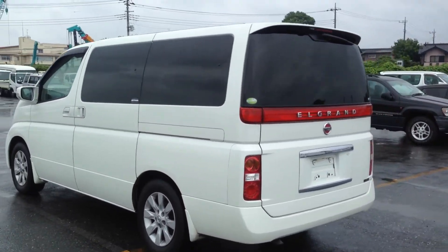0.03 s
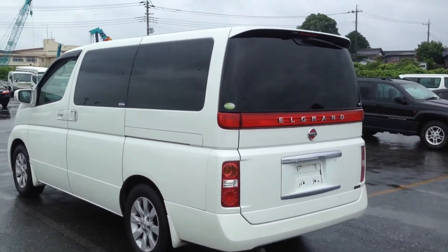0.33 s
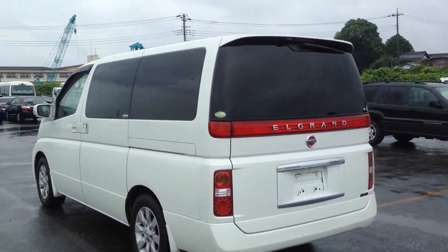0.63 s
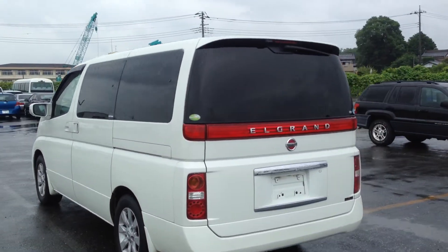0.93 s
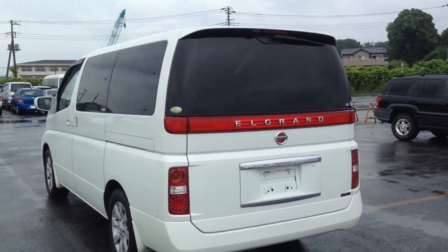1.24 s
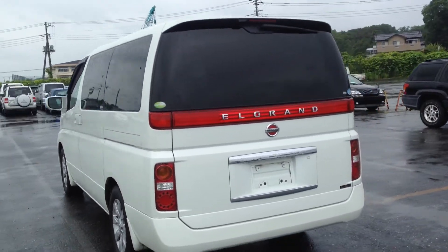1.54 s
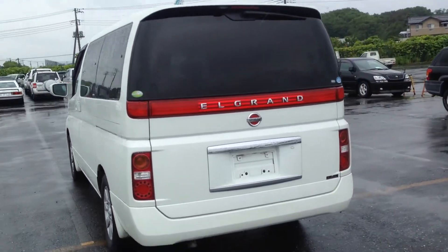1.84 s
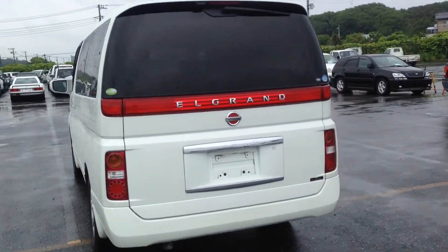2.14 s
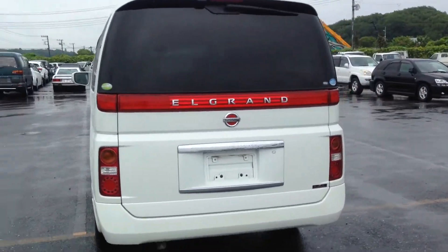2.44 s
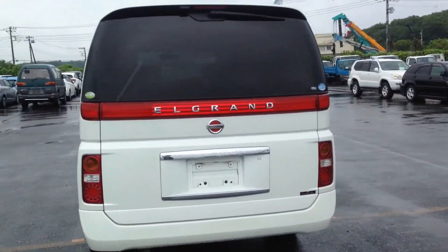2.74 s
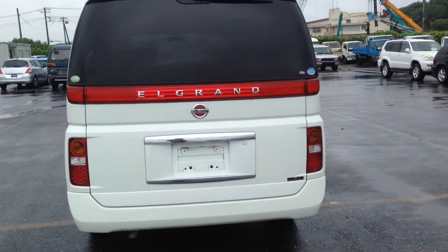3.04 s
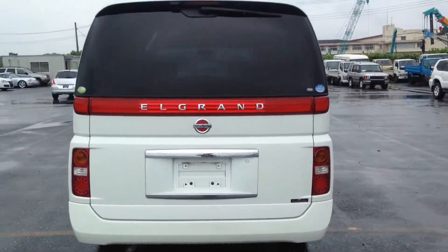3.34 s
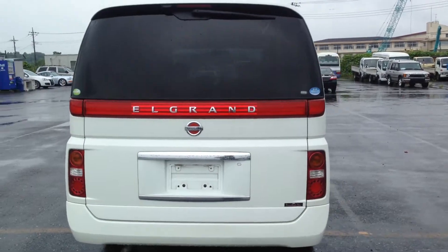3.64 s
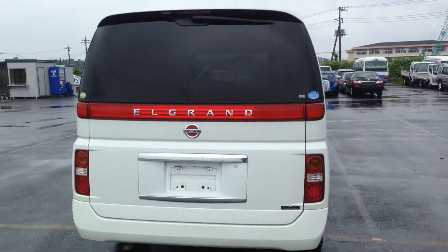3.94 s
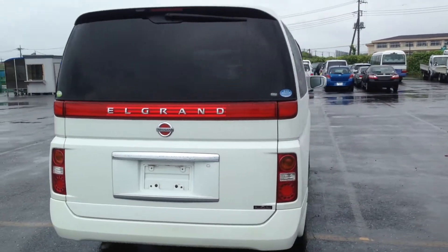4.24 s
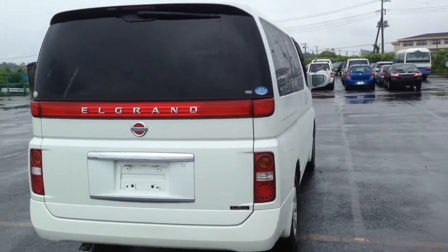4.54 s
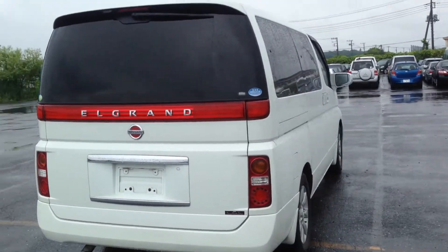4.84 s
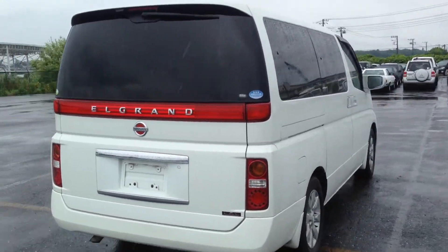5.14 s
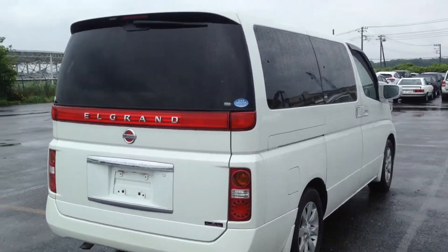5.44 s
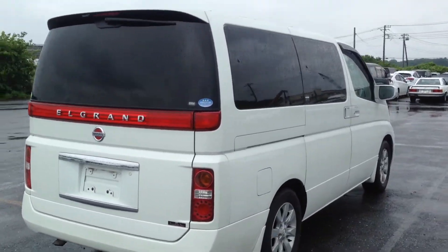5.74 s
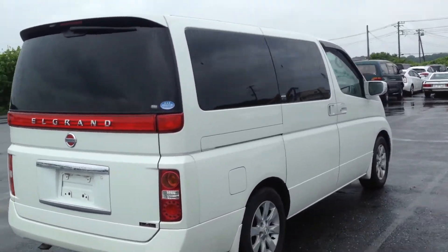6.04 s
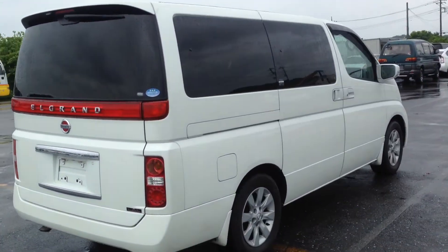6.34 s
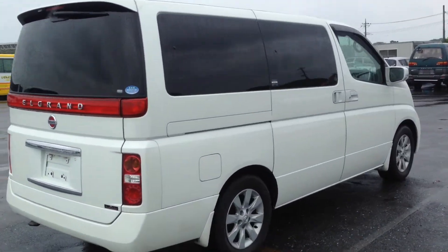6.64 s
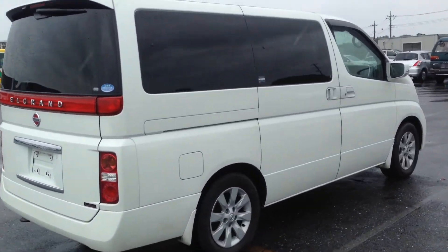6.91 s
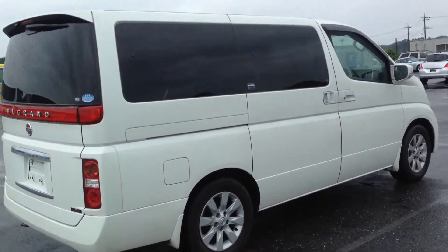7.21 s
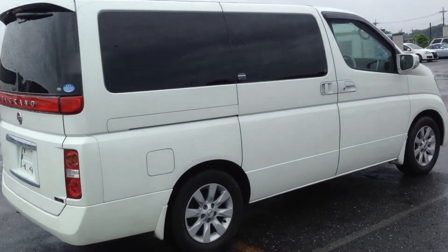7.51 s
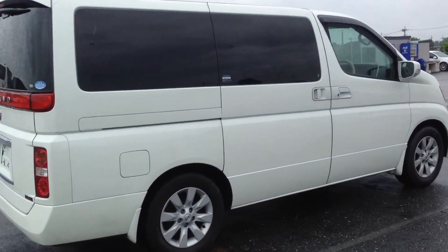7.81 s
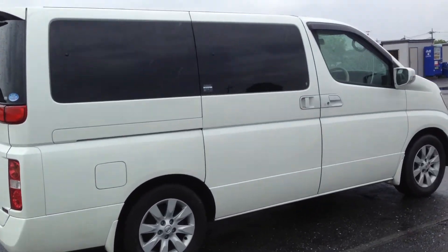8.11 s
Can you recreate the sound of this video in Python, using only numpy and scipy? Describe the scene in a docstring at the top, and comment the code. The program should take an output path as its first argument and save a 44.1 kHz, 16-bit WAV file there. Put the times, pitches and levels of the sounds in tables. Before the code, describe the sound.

Uneven wind rumbles and thumps right on the microphone in an open, wet car park, opening with a brief scrape. Someone walks slowly with faint wet, gritty steps, and a small bird gives a few high two-note calls against a steady far-off hush. The thumps get denser toward the end, until a finger slides over the microphone with a soft hiss and several sharp clicks.

```python
"""A short ringing scrape, then wind: gusts buffet the microphone port of a handheld camera with a low
rumble, and single eddies land as dull, irregular thumps. Between them someone walks slowly over a wet
asphalt car park, soles squelching faintly and snapping grit, while small birds whistle over a distant
hush. At the end a finger rubs over the port, hissing and catching, and shields it from the wind."""
import sys
import numpy as np
from scipy import signal
from scipy.fft import rfft, irfft, next_fast_len
from scipy.io import wavfile
from scipy.ndimage import uniform_filter1d, map_coordinates

SR = 44100
rng = np.random.default_rng(int(sys.argv[2]) if len(sys.argv) > 2 else 0)


def digitize_waveform(pressure):
    """Quantize a signal to 16-bit integers and store it at the path in sys.argv[1].

    Rows of a 2-D input are taken as channels; values are limited to [-1, 1].
    """
    field = np.atleast_2d(pressure).T
    bounded = np.clip(field, -1, 1)
    quanta = np.round(bounded * 32767).astype(np.int16)
    wavfile.write(sys.argv[1], SR, quanta)


N = 369028
MID_FLOW_DB = -30.5  # a middling wind
TOUCH_S = 0.013  # the time the finger takes to land


# gusts at the port: start t/s, crest t/s, end t/s, crest level/dB
GUSTS = [(0.197, 0.264, 0.38, -34.5), (0.4, 0.52, 0.53, -31), (0.539, 0.556, 0.68, -22),
         (0.678, 0.736, 0.94, -34), (1.13, 1.153, 1.205, -41.5), (1.278, 1.552, 1.62, -33.5),
         (1.634, 1.804, 1.94, -31.5), (2.01, 2.04, 2.2, -45), (2.472, 2.586, 2.67, -42.5),
         (2.833, 3.126, 3.15, -33), (3.159, 3.375, 3.57, -33), (3.534, 3.547, 3.99, -43.5),
         (3.981, 4.075, 4.326, -28.5), (4.296, 4.624, 4.8, -34.5), (4.877, 5.17, 5.23, -34),
         (5.234, 5.246, 5.494, -37.5), (5.68, 6.005, 6.08, -32.5), (6.085, 6.184, 6.28, -27),
         (6.238, 6.33, 6.47, -32.5), (6.542, 6.567, 6.78, -25.5), (6.75, 6.763, 6.96, -26),
         (6.993, 7.43, 7.47, -27.5), (7.481, 7.718, 7.86, -25.5), (7.854, 7.913, 8.44, -37)]

def gusts(swell_db=9, slacken_db=7.5, edge_db=66, attack_s=0.04, release_s=0.017, calm_db=-58.5):
    """Wind level in dB: each gust arrives abruptly, swells to its crest, slackens and drops away."""
    t = clock()
    shape_db = [-edge_db - swell_db, -swell_db, 0, -slacken_db, -edge_db - slacken_db]
    power = sum(amp(db + np.interp(t, [start - attack_s, start, crest, end, end + release_s], shape_db))
                ** 2 for start, crest, end, db in GUSTS)
    return 10 * np.log10(power + amp(calm_db) ** 2)


# tone of the rumble ahead of its moving low-pass: f/Hz, level/dB
PORT_SPECTRUM = [(15, -41), (30, -30), (50, -4), (75, 0.5), (110, 0.5), (170, -2), (260, 1.5), (360, -3.5),
                 (480, 1), (1000, -7.5)]

def buffeting(wind_db, lump_db=4.5, gap_db=7, corner_hz=225, db_per_octave=20, steepness=3.45):
    """Turbulence at the port: the stronger the flow, the smaller its eddies and the brighter it rumbles."""
    t, touch_s = clock(), FINGER_SLIDES[0][0]
    openness = np.interp(t, [touch_s - TOUCH_S, touch_s], [1, 0.59])  # the finger dulls and calms it
    # the flow is lumpy and keeps breaking off in short gaps
    gaps = np.tanh(np.maximum(wobble(40), 0) ** 2)
    lumps_db = openness * (lump_db * np.tanh(wobble(65)) - gap_db * (gaps - gaps.mean()))
    # it stalls just ahead of each hard eddy, then stirs around it
    stalls = swells([(s - 0.017, 0, 0.0057) for s, _, _ in HARD_EDDIES])
    stall_db = 2 * np.minimum(stalls, 1)
    flurries = swells([(s, db - 12.5, 0.0078) for s, db, _ in HARD_EDDIES])
    flow_db = 20 * np.log10(np.hypot(amp(wind_db + lumps_db - stall_db), flurries))
    # brightness wanders and leans toward the pitch of nearby hard eddies
    eddy_s, _, eddy_hz = np.transpose(HARD_EDDIES)
    typical_hz = 235
    nearby_octaves = np.log2(np.interp(t, eddy_s, eddy_hz, right=typical_hz) / typical_hz)
    fineness = 0.28 * nearby_octaves + 0.23 * np.tanh(wobble(45))
    corner_octave = np.log2(corner_hz * openness) + (flow_db - MID_FLOW_DB) / db_per_octave + fineness
    turbulence, rumble = rng.standard_normal(N), np.zeros(N)
    for octave in np.arange(12, 19) / 2:  # crossfade low-passes half an octave apart
        rolloff = lambda hz: (1 + (hz / 2 ** octave) ** 2 / steepness) ** steepness
        layer = filtered(turbulence, lambda hz: colour(PORT_SPECTRUM, hz) / rolloff(hz))
        rumble += unit(layer) * np.maximum(0, 1 - 2 * abs(np.clip(corner_octave, 6, 9) - octave))
    # level the rumble so that the flow alone rides its volume
    power = uniform_filter1d(uniform_filter1d(rumble ** 2, size=1300), size=700)
    return amp(flow_db - 1) * rumble / np.sqrt(abs(power) + 1e-6)


# hard eddies, each a distinct thump: t/s, nominal level/dB, nominal f/Hz
HARD_EDDIES = [(0.383, -24, 250), (0.431, -16, 150), (0.556, -10, 207), (0.623, -14, 154),
               (1.309, -20.5, 143), (1.407, -22.5, 187), (1.496, -17.5, 210.0), (1.525, -18, 168.0),
               (1.572, -17, 203), (1.67, -21.5, 164), (1.748, -22.5, 237), (1.802, -21, 130),
               (1.978, -27, 157), (2.078, -29.5, 167), (2.853, -26.5, 295.0), (2.991, -20, 200),
               (3.06, -21.5, 159), (3.098, -17.5, 175), (3.252, -15.5, 178), (3.394, -12.0, 188),
               (3.449, -24.5, 190), (3.506, -16.5, 157.0), (3.929, -23.5, 150.0), (4.011, -18, 217),
               (4.045, -15.5, 217), (4.066, -11.5, 240), (4.093, -17.5, 260.0), (4.158, -10.5, 216.0),
               (4.607, -22.5, 190), (4.76, -27, 170), (5.119, -18.5, 187), (5.153, -15, 184),
               (5.185, -18.0, 207.0), (5.838, -20, 218), (5.985, -14, 174), (6.134, -17, 206),
               (6.156, -17.5, 328), (6.195, -16.5, 255), (6.375, -13, 190), (6.569, -14.5, 266),
               (6.598, -18.0, 160.0), (6.64, -14.5, 343), (6.753, -12, 178), (6.778, -12, 148.0),
               (6.811, -15.5, 244), (6.876, -10, 202), (6.907, -13, 252), (6.974, -22.5, 248),
               (7.088, -18.5, 254), (7.157, -14.0, 290), (7.241, -17, 287), (7.332, -14.5, 291),
               (7.348, -12, 221.0), (7.378, -12, 320.0), (7.397, -7.5, 199.0), (7.499, -13.5, 345.7),
               (7.619, -17.5, 254), (7.645, -12.5, 280.0), (7.667, -11.5, 364), (7.692, -11.5, 400),
               (7.77, -7.5, 250.0), (7.812, -13, 247.7), (7.851, -16.5, 320)]

def thumps(wind_db, neighbour_db=-9, spacing_s=0.00814, lowpass_hz=880):
    """An eddy is one lopsided push of pressure with a narrow core; a weaker one leads or trails it."""
    eddies = list(HARD_EDDIES) + lesser_eddies(wind_db)
    out, t = np.zeros(N), np.arange(-SR // 40, SR // 40) / SR
    push = lambda hz: (1 - 2 * (np.pi * hz * t) ** 2) * np.exp(-(np.pi * hz * t) ** 2)
    for (s, db, hz), (skew, neighbour_skew, lag) in zip(eddies, rng.uniform(-1, 1, (len(eddies), 3))):
        core_db = -11 + 0.44 * (db + 15.5)  # louder hits have a harder core
        pulse = push(0.9 * hz) + amp(core_db) * push(1.83 * hz)
        eddy = amp(db - 1) * signal.hilbert(pulse) / pulse.max()
        add(out, s + t[0], np.real(eddy * np.exp(1j * np.pi * skew)))
        neighbour = amp(neighbour_db) * np.real(eddy * np.exp(1j * np.pi * neighbour_skew))
        add(out, s + t[0] + spacing_s * (np.sign(lag) / 2 + lag), neighbour)
    return filtered(out, lambda hz: 1 / (1 + (hz / lowpass_hz) ** 6))


def lesser_eddies(wind_db, count=55, over_flow_db=4.5, scatter_db=2, mid_hz=233, db_per_octave=29):
    """Rows of chance eddies while the port is open: more flow makes them louder and higher."""
    times = (np.arange(count) + rng.random(count)) / count * FINGER_SLIDES[0][0]
    local_db = np.interp(times, clock(), wind_db)
    levels = local_db + over_flow_db + scatter_db * rng.standard_normal(count)
    pitches = mid_hz * 2 ** ((local_db - MID_FLOW_DB) / db_per_octave)
    return list(zip(times, levels, pitches))


# strokes of the opening scrape: attack end t/s, decay start t/s, level/dB
SCRAPE_STROKES = [(0, 0.051, -35), (0.178, 0.173, -52.5)]
# resonances that make it ring: f/Hz, nominal width/Hz, level/dB
SCRAPE_MODES = [(470, 150, -5.5), (1710, 210, 2.5), (2270, 430, -14), (3540, 1800, -20.5),
                (7100, 3000, -35)]

def scrape(rise_db_per_s=500, fall_db_per_s=323):
    """Friction noise rings a few resonances and dies away after each stroke."""
    t, envelope = clock(), np.zeros(N)
    for start, end, db in SCRAPE_STROKES:
        fade_db = rise_db_per_s * np.maximum(start - t, 0) + fall_db_per_s * np.maximum(t - end, 0)
        envelope += amp(db - fade_db)
    body = lambda f: np.sqrt(sum(abs(amp(db) * resonance(f, hz, 1.57 * width) ** 2) ** 2
                                 for hz, width, db in SCRAPE_MODES))
    return envelope * unit(filtered(rng.standard_normal(N), body))


# slides of the finger by the port: t/s, level/dB, decay/(dB/s)
FINGER_SLIDES = [(7.864, -47.5, 26.5), (8.201, -48, 5)]
# bright hiss of skin: f/Hz, level/dB
SKIN_SPECTRUM = [(530, -8.5), (900, -14), (1040, -11.5), (1110, -16), (1520, -14), (1790, -12),
                 (2160, -5.5), (2350, -6), (3520, -6.5), (6910, -20.5), (11000, -16), (11900, -11.5),
                 (15300, -9)]

def finger_hiss():
    """Skin slides by the port with a grainy hiss that starts at once and eases off."""
    t = clock()
    slides = [np.clip(1 + (t - s) / TOUCH_S, 0, 1) ** 2 * amp(db - decay * np.maximum(t - s, 0))
              for s, db, decay in FINGER_SLIDES]
    return np.max(slides, axis=0) * crackle(SKIN_SPECTRUM, spread_db=2.5)


# the skin catches at the port: t/s, level/dB
SKIN_CATCHES = [(8.058, -54), (8.136, -36), (8.172, -39.5), (8.19, -27.5), (8.22, -30.5), (8.224, -30.5),
                (8.267, -27), (8.271, -28.5), (8.315, -32.5), (8.354, -39.5)]
# the crack of a catch: f/Hz, level/dB
CATCH_SPECTRUM = [(300, -1), (1100, -1.5), (3500, 2), (6500, -18), (11000, -7.5), (13500, -5), (15300, -2)]
# ring of the casing: f/Hz, level/dB, t60/s
CASING_MODES = [(1245, -8.5, 0.029), (2000, -4, 0.013), (2640, -6, 0.041), (3400, -4, 0.011),
                (3720, -5.5, 0.013), (13400, -6, 0.008)]

def finger_catches(ring_db=-7, scatter_db=2, detune=0.049, crack_db=-7, crack_t60=0.023):
    """Each catch of the skin cracks and rings the casing, never quite the same way twice."""
    rings, cracks, t = np.zeros(N), np.zeros(N), np.arange(SR // 20) / SR
    for s, db in SKIN_CATCHES:
        for hz, mode_db, t60 in CASING_MODES:
            louder, higher = rng.standard_normal(2)
            envelope = amp(db + ring_db + mode_db + scatter_db * louder - 60 * t / t60)
            add(rings, s, envelope * np.sin(2 * np.pi * hz * (1 + detune * higher) * t))
        add(cracks, s, amp(db + crack_db - 60 * t / crack_t60))
    return rings + cracks * noise(CATCH_SPECTRUM)


# soles on wet ground: t/s, level/dB, half-width/s, squelch f/Hz
STEPS = [(0.58, -60, 0.035, 3400), (0.888, -46.5, 0.011, 2560), (1.064, -57.5, 0.011, 2010),
         (1.684, -55.5, 0.015, 2240), (1.88, -57, 0.022, 1940), (2.283, -53.5, 0.015, 1670),
         (2.78, -49.5, 0.012, 3480), (3.404, -55.5, 0.023, 2030), (3.874, -47, 0.0058, 3240),
         (3.899, -52.5, 0.009, 3180), (4.364, -53, 0.016, 1900), (5.008, -59.5, 0.041, 1780),
         (5.552, -57, 0.025, 1500), (6.07, -51, .01, 3900), (6.594, -56, .012, 1960),
         (6.688, -52, 0.0059, 2060), (7.164, -50.5, 0.0063, 2900), (7.759, -55.5, 0.028, 2120)]
# scuff of a sole: f/Hz, level/dB
SOLE_SPECTRUM = [(150, -2.5), (500, 8.5), (1300, 1), (2100, 6), (2900, -2), (3900, 0), (5000, -7),
                 (8000, -17), (15000, -40)]

def footsteps(scuff_db=-3, squelch_db=-2, pocket_width_hz=750):
    """Each sole scuffs the ground and squeezes water from a ringing pocket; firm steps squelch most."""
    scuffs = amp(scuff_db) * swells([row[:3] for row in STEPS]) * crackle(SOLE_SPECTRUM, spread_db=3.5)
    squelches, t = np.zeros(N), np.arange(-SR // 8, SR // 8) / SR
    firmest_db = max(row[1] for row in STEPS)
    for s, db, half_width, hz in STEPS:
        pocket = filtered(rng.standard_normal(len(t)), lambda f: resonance(f, hz, pocket_width_hz) ** 2)
        pressure = amp(db + squelch_db + (db - firmest_db))
        add(squelches, s + t[0], pressure * unit(pocket) * np.exp(-(t / half_width) ** 2 / 2))
    return scuffs + squelches


# snaps of grit and water film: t/s, level/dB, ring f/Hz, relative treble level/dB
GRIT_SNAPS = [(0.8726, -33.5, 2390, -32), (0.8847, -34, 2520, -28), (0.8982, -30, 2070, -26),
              (1.6794, -43, 1760, -4), (1.697, -45, 2200, 1), (2.771, -36.5, 2040, -24),
              (2.8737, -41, 1670, -15), (3.0012, -44, 2100, -24), (3.8739, -33.5, 2470, -29),
              (3.8874, -37, 3440, -18.5), (4.4898, -46.5, 1840, -8), (4.994, -37, 1760, -27),
              (5.025, -39.5, 2370, -4.5), (5.5642, -43.5, 2190, -20), (5.7092, -44.5, 2380, -16),
              (6.073, -42.5, 4970, -26), (6.2419, -45, 2100, -23), (7.156, -39.5, 2270, -23),
              (7.195, -43, 1840, -21)]
# crisp top of a snap: f/Hz, level/dB
SNAP_SPECTRUM = [(1500, -41), (5000, 14), (8000, 6), (15000, -2)]

def grit(ring_db=-1, ring_t60=0.0074, crack_db=-7, treble_db=-3, crack_t60=0.011):
    """A grain snaps under the sole: a crack and a very short, rough ring."""
    rings, cracks, treble = np.zeros((3, N))
    t = np.arange(SR // 20) / SR
    for (s, db, hz, high_db), overtone in zip(GRIT_SNAPS, rng.uniform(0.97, 2.23, len(GRIT_SNAPS))):
        ring = np.sin(2 * np.pi * hz * t) - .5 * np.sin(2 * np.pi * hz * overtone * t)
        add(rings, s, amp(db + ring_db - 60 * t / ring_t60) * ring)
        add(cracks, s, amp(db + crack_db - 60 * t / crack_t60))
        add(treble, s, amp(db + high_db + treble_db - 60 * t / crack_t60))
    return rings + cracks * noise(SOLE_SPECTRUM) + treble * noise(SNAP_SPECTRUM)


# note shapes, ahead of each call's transposition and gain: t/s into the note, f/Hz, level/dB
CHIP_NOTE = [(0, 6200, -13), (.006, 5700, -6), (.016, 4450, -7), (.026, 4550, -24), (.042, 4700, -11.5),
             (.058, 4900, -20)]
SWOOP_NOTE = [(0, 7400, -21), (.013, 7110, -19.5), (.028, 6150, -9), (.041, 5450, -5.5), (.055, 5250, -14),
              (.066, 5230, -50)]
SLUR_NOTE = [(0, 3400, -14), (.035, 3700, -4), (.07, 4100, 0), (.09, 4300, -14)]
# near bird: chip t/s, swoop t/s, level/dB, pitch ratio
NEAR_CALLS = [(1.622, 1.687, -45.5, 1.02), (2.879, 2.95, -46.5, 1.025), (4.144, 4.213, -46.5, 0.98),
              (5.963, 6.031, -49.5, 0.95)]
# far bird: t/s, level/dB, pitch ratio
FAR_CALLS = [(.39, -68.5, 1.44), (4.3, -68, 1.02), (4.8, -69.5, 1.0), (5.04, -70, 1.0), (5.29, -73, 1.0)]

def birds(chip_db=-5):
    """A two-note flight call sounds overhead; another bird slurs upward farther off."""
    out = np.zeros(N)
    for chip_s, swoop_s, db, ratio in NEAR_CALLS:
        add(out, chip_s, amp(db + chip_db) * whistle(CHIP_NOTE, ratio, waver=0.058, flutter_db=2))
        add(out, swoop_s, amp(db) * whistle(SWOOP_NOTE, ratio, waver=0.012, flutter_db=2))
    for s, db, ratio in FAR_CALLS:
        add(out, s, amp(db) * whistle(SLUR_NOTE, ratio, waver=0.028, flutter_db=4))
    return out


def whistle(shape, ratio, waver, flutter_db):
    """One whistled glide, unsteady in pitch and strength."""
    s, hz, db = np.transpose(shape)
    t = np.arange(int(s[-1] * SR)) / SR
    drift, flutter = (np.interp(t, np.linspace(0, s[-1], 40), rng.standard_normal(40)) for _ in range(2))
    pitch = np.interp(t, s, hz) * ratio * (1 + waver * drift)
    envelope = amp(np.interp(t, s, db) + flutter_db * flutter)
    return np.sqrt(2) * envelope * np.sin(2 * np.pi * np.cumsum(pitch) / SR)


def echoes(x, t60, wet_db, predelay_s=0.008):
    """Parked cars scatter a short, weak tail."""
    t = np.arange(SR // 3) / SR
    tail = rng.standard_normal(len(t)) * amp(-60 * t / t60) * (t > predelay_s)
    return amp(wet_db) * signal.fftconvolve(x, tail / np.linalg.norm(tail))[:N]


# the ambience bed: f/Hz, level/dB
HUSH_SPECTRUM = [(30, -4), (80, 17), (200, 4.5), (400, 2), (700, -1.5), (1300, -1), (2200, -2), (2900, -8),
                 (4000, -6), (5500, -10.5), (8000, -13), (15000, -14.5)]

def distant_hush(level_db=-60, drift_db=0.5):
    """The steady hush of far roads and trees."""
    return amp(level_db + drift_db * wobble(2.37)) * noise(HUSH_SPECTRUM)


def amp(db):
    """Decibels to gain."""
    return 10 ** (np.asarray(db) / 20)


def unit(x):
    """Scale to rms 1."""
    return x / np.sqrt(np.mean(x ** 2) + 1e-20)


def clock():
    """The time of every sample."""
    return np.arange(N) / SR


def colour(spectrum, hz):
    """Gain of an EQ curve of (f/Hz, level/dB) points, read on a log axis."""
    f, db = np.transpose(spectrum)
    return amp(np.interp(np.log(hz + 1), np.log(f), db))


def resonance(f, hz, width):
    """Response of one damped mode."""
    return 1j * f * width / (hz * hz - f * f + 1j * f * width)


def filtered(x, response):
    """Shape x with a frequency response."""
    size = next_fast_len(len(x) + SR // 2)
    return irfft(rfft(x, size) * response(np.fft.rfftfreq(size, 1 / SR)), size)[:len(x)]


def noise(spectrum):
    """Coloured noise, rms 1."""
    return unit(filtered(rng.standard_normal(N), lambda hz: colour(spectrum, hz)))


def wobble(rate):
    """A smooth random curve, rate knots a second."""
    return map_coordinates(rng.standard_normal(int(N * rate / SR) + 4), [clock() * rate], order=3)


def crackle(spectrum, spread_db):
    """Dense tiny grains of unequal size, rms 1."""
    grains = rng.standard_normal(N) * amp(spread_db * wobble(1000))
    return unit(filtered(grains, lambda hz: colour(spectrum, hz)))


def swells(rows):
    """An envelope of bell-shaped swells from (t/s, level/dB, half-width/s) rows."""
    t = clock()
    return sum(amp(db) * np.exp(-np.minimum(((t - s) / width) ** 2 / 2, 20)) for s, db, width in rows)


def add(track, s, sound):
    """Mix a sound into the track at s seconds."""
    start = max(0, round(s * SR))
    track[start:start + len(sound)] += sound[:max(0, N - start)]


def scene():
    """Mono mix: steps and birds with their echoes over the hush; wind, scrape and finger stay dry."""
    steps, calls, wind_db = footsteps() + grit(), birds(), gusts()
    tails = echoes(steps, t60=0.43, wet_db=-15) + echoes(calls, t60=0.52, wet_db=-12)
    outdoors = steps + calls + tails + distant_hush()
    wind = buffeting(wind_db) + thumps(wind_db)
    return (outdoors + wind + scrape() + finger_catches() + finger_hiss())[None]


def record(dry, top_hz=15400):
    """The camera keeps nothing above its band limit."""
    return np.array([filtered(channel, lambda hz: hz < top_hz) for channel in dry])


dry = scene()
out = record(dry)
digitize_waveform(out)
```